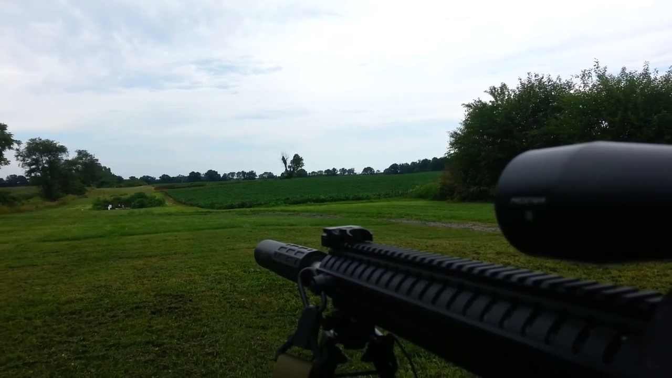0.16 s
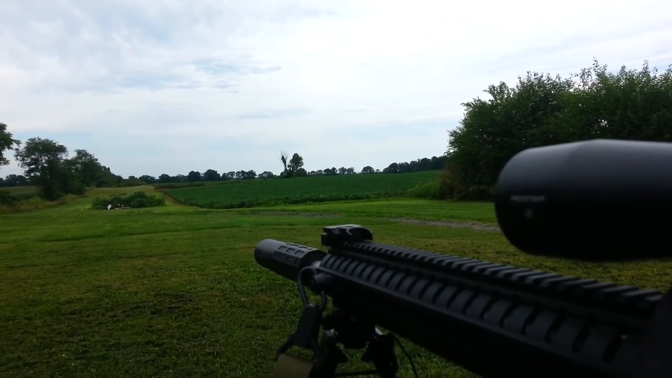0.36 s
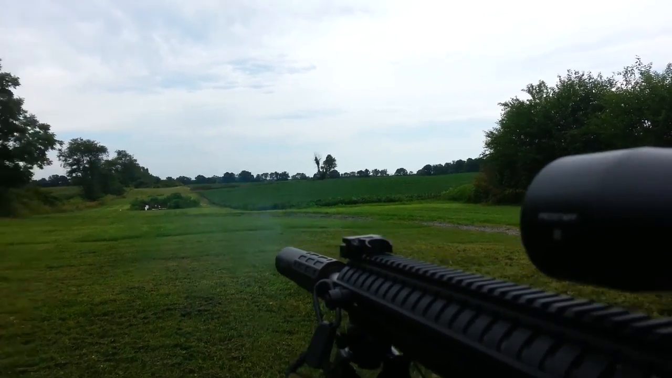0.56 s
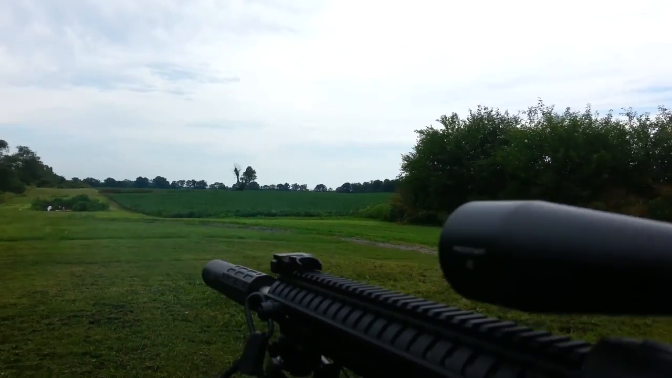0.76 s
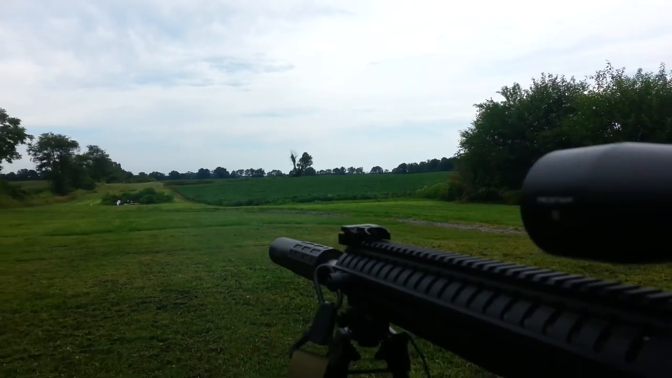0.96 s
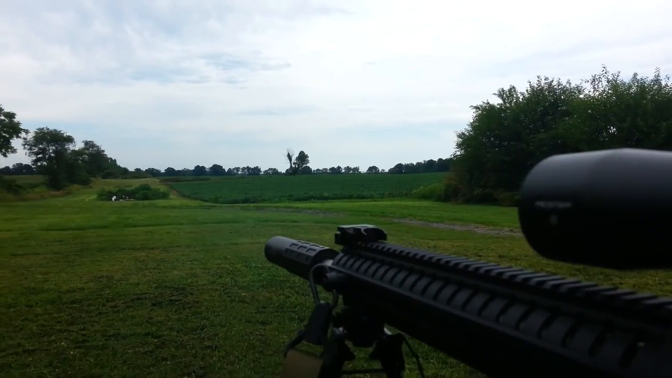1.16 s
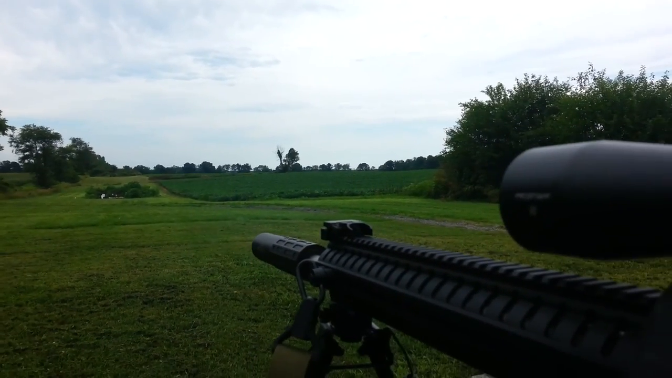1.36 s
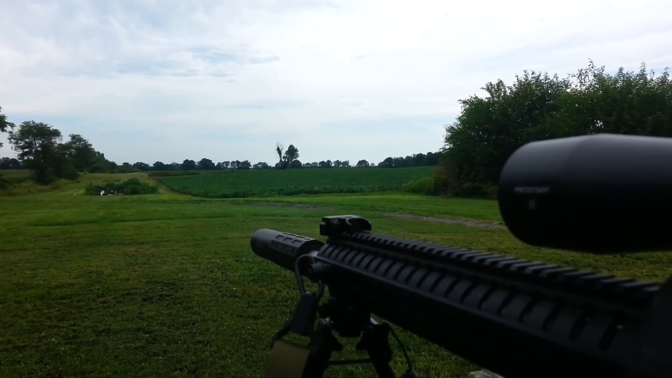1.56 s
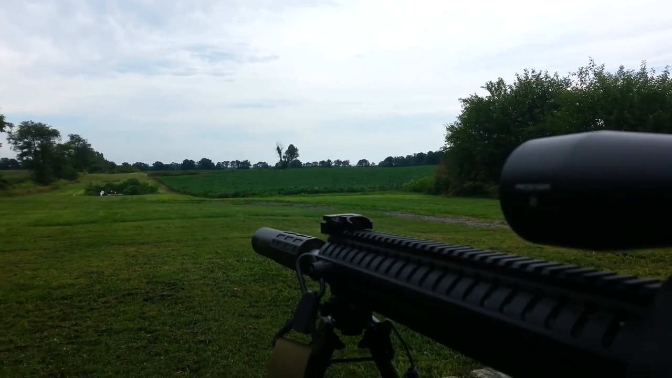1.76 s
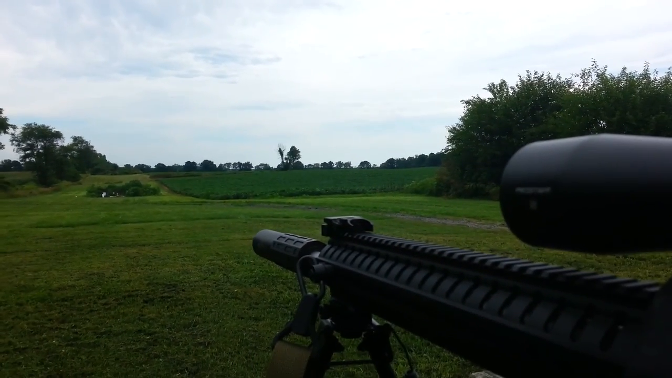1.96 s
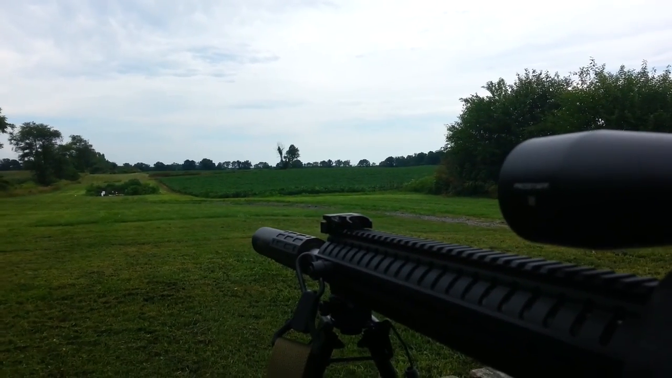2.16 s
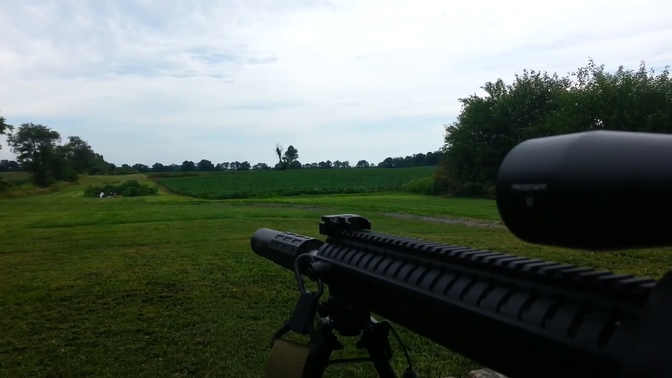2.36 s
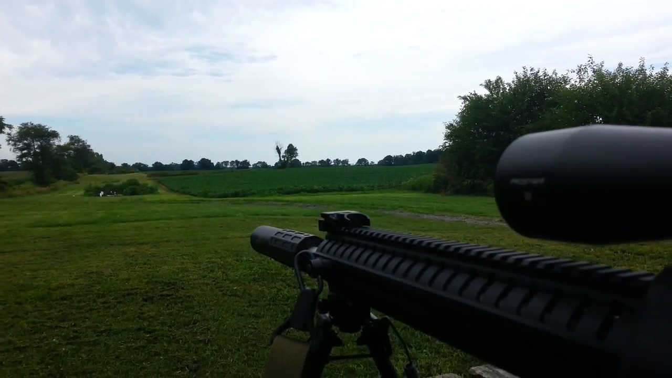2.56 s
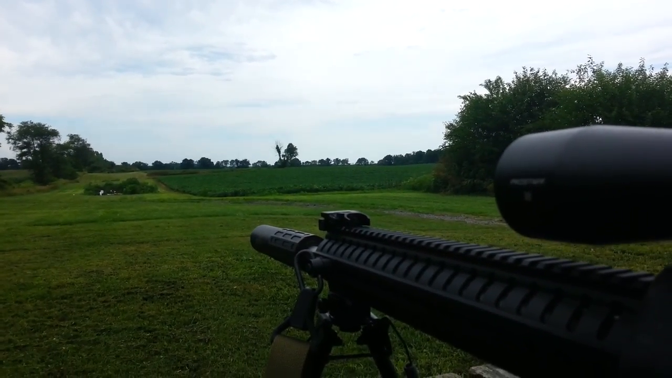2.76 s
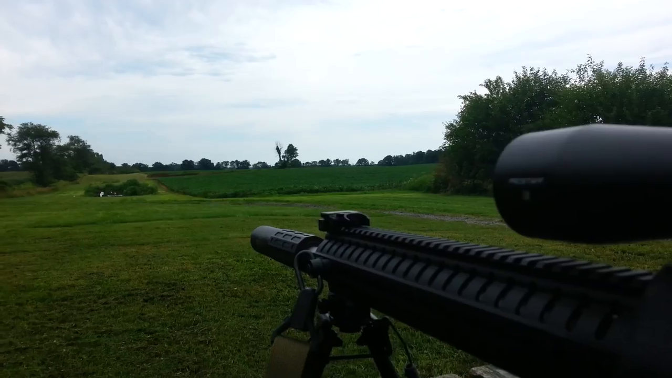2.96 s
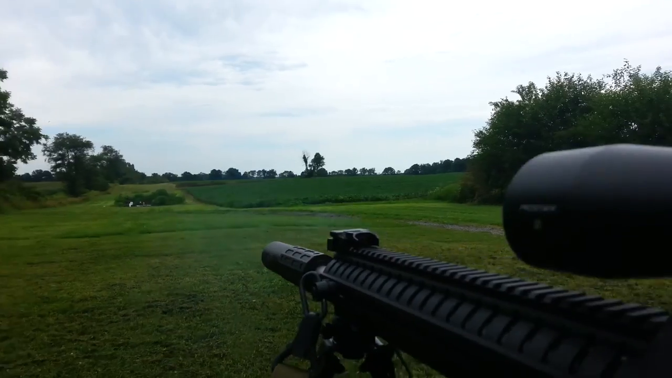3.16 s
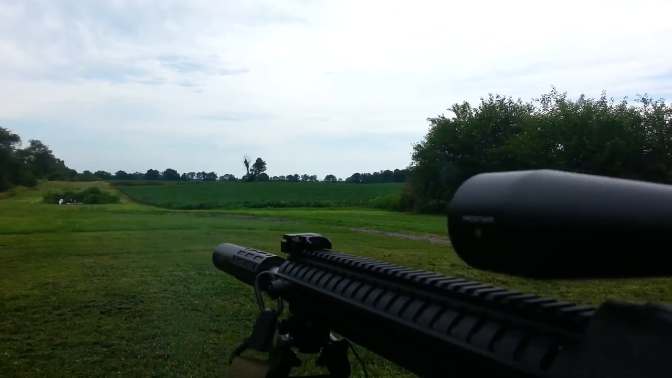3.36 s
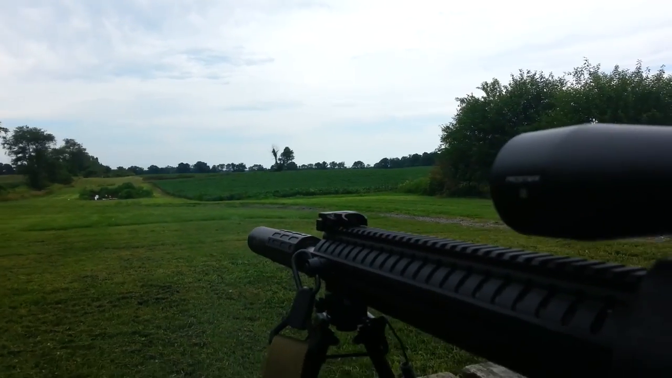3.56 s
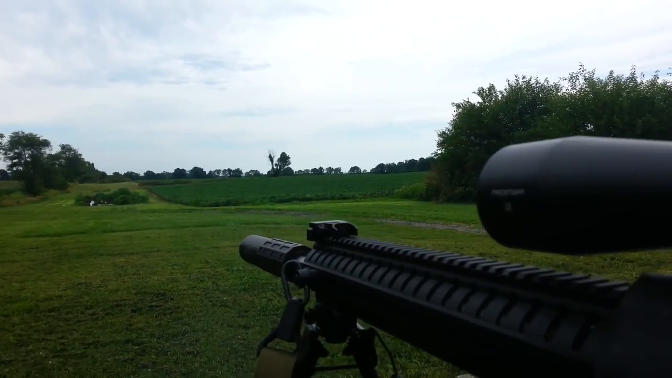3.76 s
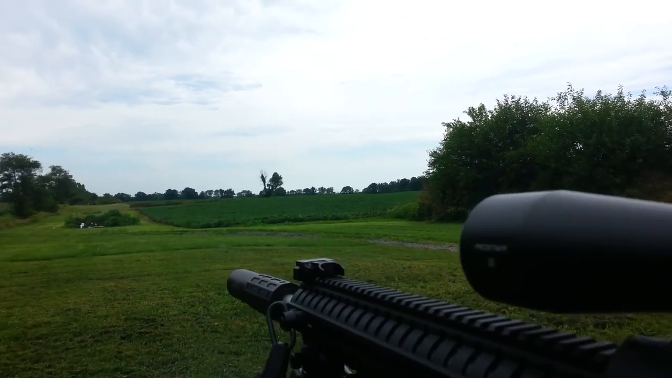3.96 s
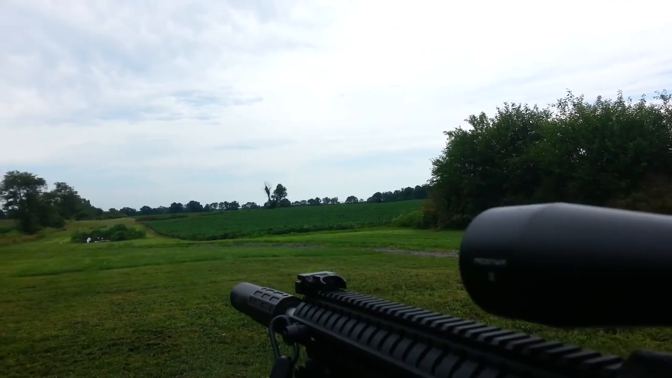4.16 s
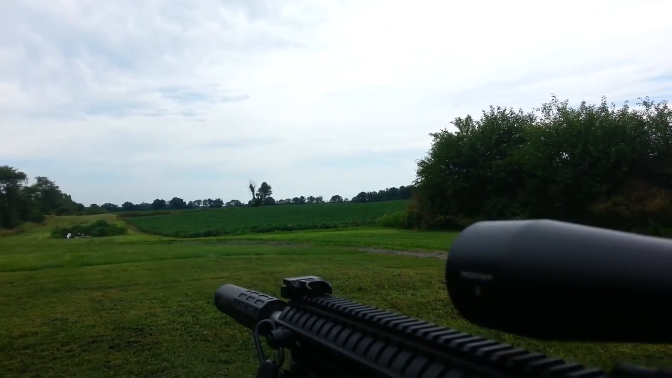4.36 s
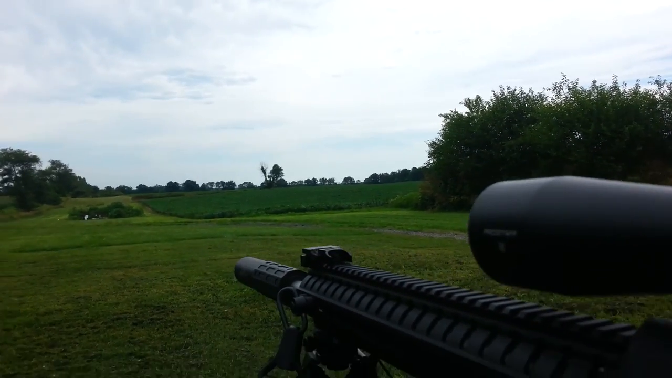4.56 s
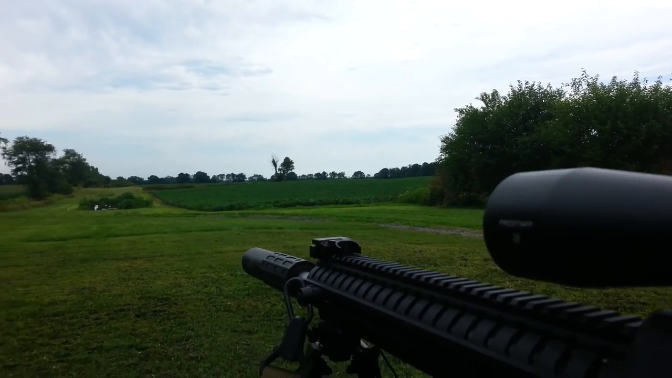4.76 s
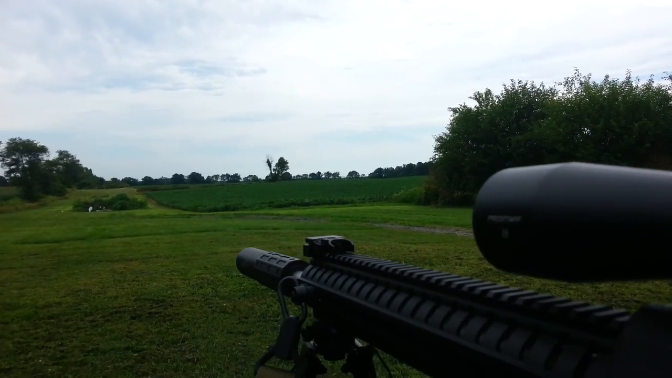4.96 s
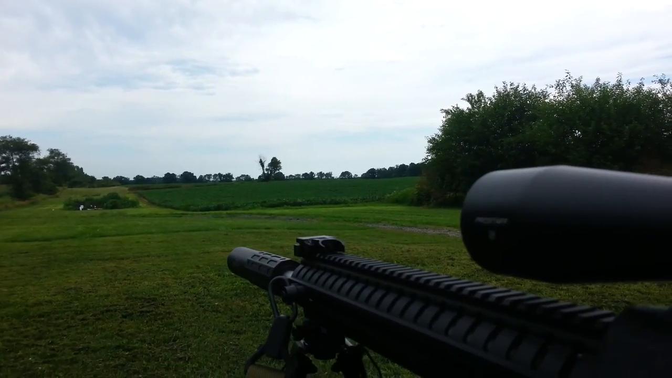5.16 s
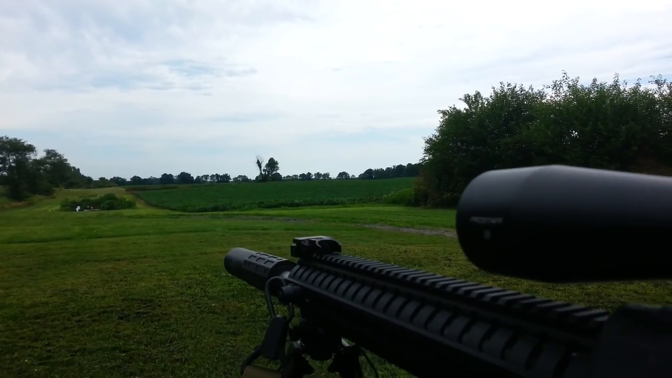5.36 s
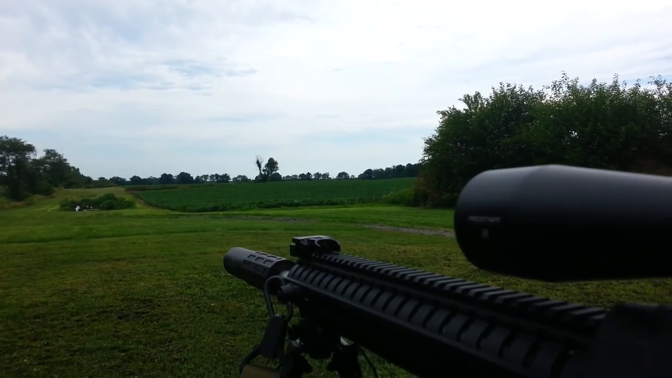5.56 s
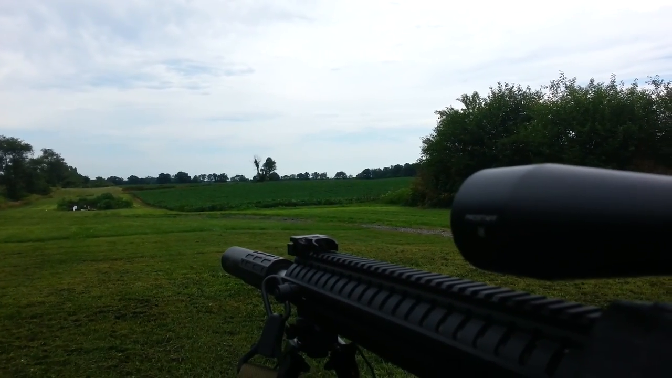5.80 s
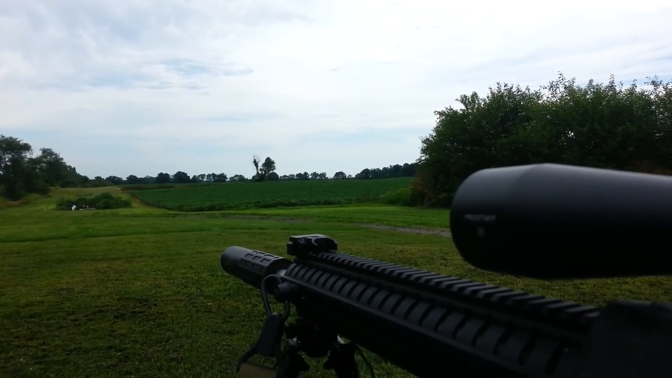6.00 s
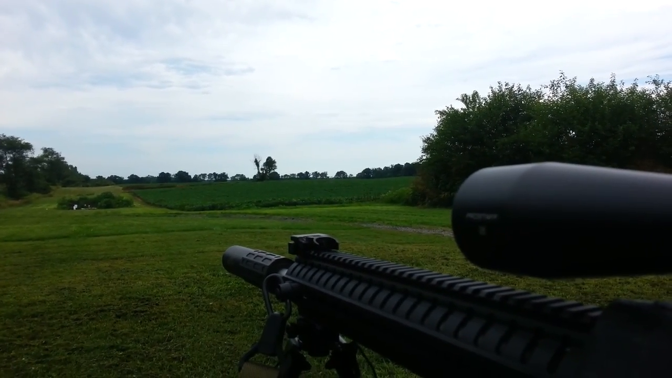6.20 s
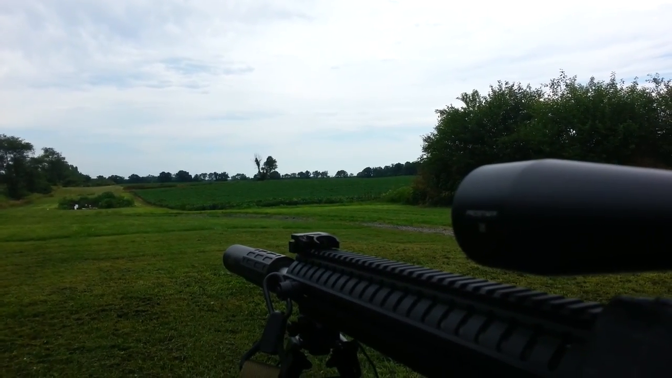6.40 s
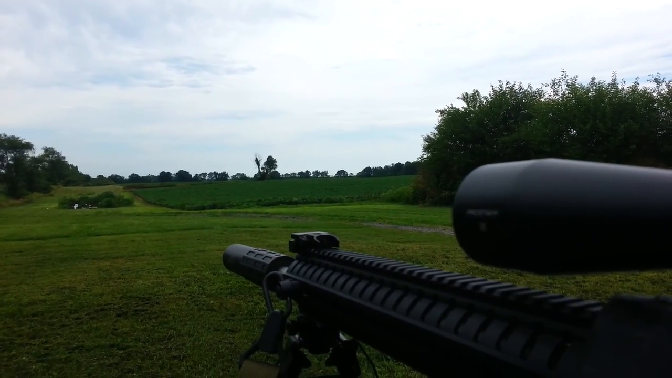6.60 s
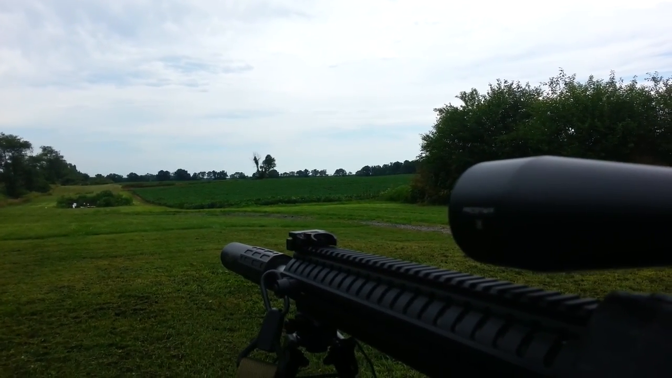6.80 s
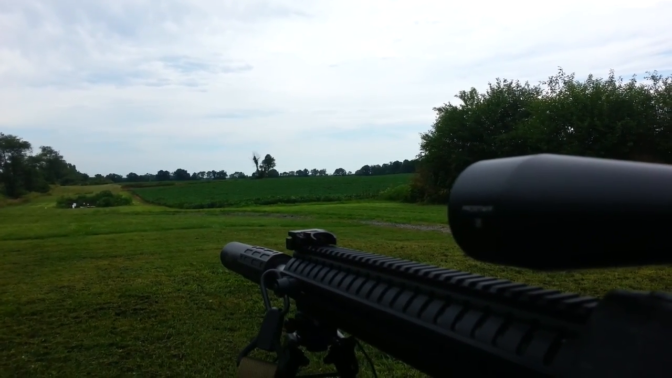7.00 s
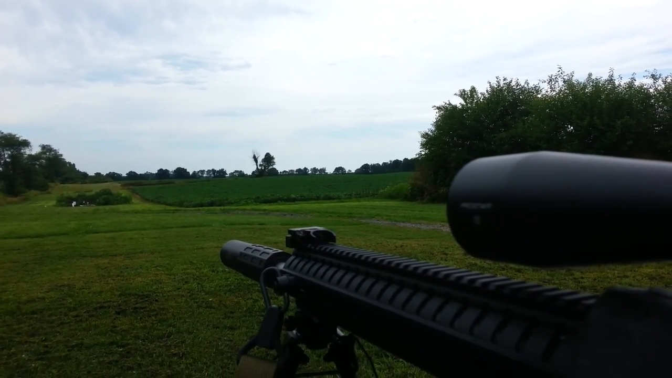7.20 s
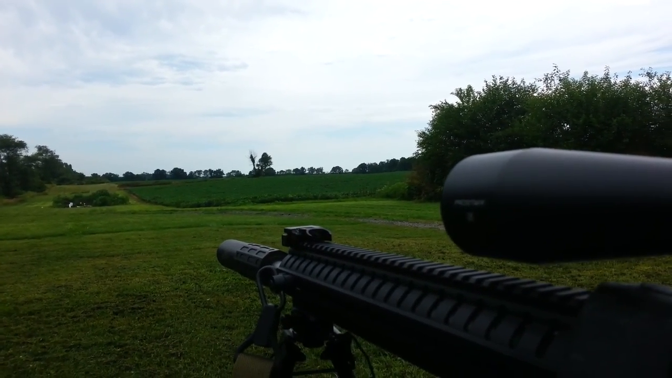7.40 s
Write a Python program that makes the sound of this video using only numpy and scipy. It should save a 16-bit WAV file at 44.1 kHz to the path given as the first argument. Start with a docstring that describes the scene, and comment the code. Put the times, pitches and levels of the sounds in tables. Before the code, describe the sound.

Close beside a suppressed rifle outdoors, a harsh snap and gas blast clip the microphone, with the action slamming shut and a bright hissing echo off bushes. A second later a hard crack marks the hit, with a faint steel ring. A second shot and hit repeat this about two and a half seconds later. Birds whistle and chirp over quiet air, breeze bumps and a faint left-side electrical ticking.

```python
"""Suppressed rifle shots on a mown field

Two shots, heard beside the gun, overload the microphone: each superposes filtered-noise bursts for a snap, a
gas blast and the closing action. Foliage and tree lines scatter them back as noise washes and wave packets;
a second later the bullet's hit cracks and steel rings in decaying sines. Gliding sine tones make birdsong
over hushed noise, air nudges the microphone in low packets, and pulses tick in the left channel."""
import sys
import numpy as np
from scipy import signal
from scipy.fft import rfft, irfft
from scipy.io import wavfile

SR = 44100
rng = np.random.default_rng(int(sys.argv[2]) if len(sys.argv) > 2 else 0)


def wav_record(signal):
    """Record a signal, one row per channel, as 16-bit PCM in the file named by sys.argv[1]."""
    frames = np.transpose(np.atleast_2d(signal))
    bounded = np.clip(frames, -1, 1)
    # unit amplitude maps onto the largest positive 16-bit level
    quanta = np.round(bounded * 32767).astype(np.int16)
    wavfile.write(sys.argv[1], SR, quanta)


N = 328104

# In all tables "balance" is the left level minus the right level.
# Spectra, as relative density: [f/Hz, level/dB]
# open air and microphone hiss
AIR_SPECTRUM = [(20, -33.5), (33, -18), (55, -6.5), (95, -3), (160, -6.5), (300, -11), (600, -15.5),
                (1200, -20), (2500, -22.5), (3600, -23.5), (6300, -29.5), (9000, -28), (14500, -27.5)]
# snap of the shot, also used for the debris of a hit
SNAP_SPECTRUM = [(30, -11), (300, -7), (1200, -1.5), (3000, 0.5), (6000, -4), (14000, -12)]
# gas blast
BLAST_SPECTRUM = [(20, -13.5), (36, -12), (75, -20.5), (120, -13), (190, -4.5), (350, 1), (700, -1.5),
                  (1100, 1), (1500, 0.5), (2600, 1.5), (4200, -1.5), (6000, -5.5), (10000, -6.5),
                  (15000, -10.5)]
# closing action
SLAM_SPECTRUM = [(30, -9), (300, -12.5), (1200, -5.5), (3600, 2.5), (6000, -6), (14000, -13.5)]
# bullet striking the target
HIT_SPECTRUM = [(25, -11.5), (90, -7), (220, -19), (480, -10), (660, -0.5), (830, -7.5), (1080, 2.5),
                (1500, -1), (2200, -0.5), (3100, -1), (3800, 0.5), (4500, -6.5), (6000, -12), (9000, -17.5),
                (14000, -22)]
# short echo of that strike
HIT_ECHO_SPECTRUM = [(300, -17), (600, -4), (850, -2.5), (1100, -3), (1600, -11.5), (2500, -16),
                     (4000, -13), (6000, -31.5), (12000, -42)]
# sound scattered by foliage
SCATTER_SPECTRUM = [(50, -40), (110, -27), (220, -11), (380, -24), (520, -16.5), (800, -13), (1150, -12),
                    (2100, 0), (2900, 2.5), (3900, 0), (5800, -12.5), (8500, -11), (11500, -22.5),
                    (14500, -22)]

# strongest bumps of air on the microphone: [t/s, level/dB, balance/dB]
STRONG_BUMPS = [(3.915, -41.5, 17), (4.542, -39, -8), (4.612, -40.5, -10), (4.893, -34, 15.5),
                (5.841, -34.5, 25), (5.892, -33, 11.5), (7.19, -42.5, 10), (7.282, -43, -1.5)]
# faint rustles near the gun:
# [centre t/s, level/dB, centre f/Hz, half-width/octaves, half-length/s, balance/dB]
RUSTLE_PACKETS = [(2.605, -55, 2280, 0.45, 0.034, -8), (4.32, -53, 2640, 0.62, 0.081, -11),
                  (5.55, -56, 2040, 0.3, 0.081, -4.5)]
# kinds of bird note, each from its own perch:
# {kind: [length/s, start/semitones, end/semitones (re middle pitch), buzz depth/Hz, balance/dB]}
NOTE_KINDS = {"trill": (.6, .7, -.6, 170, -13), "whistle": (.085, -.7, -.35, 0, -9),
              "long whistle": (.125, .2, 0, 35, 10), "thin note": (.13, .15, .05, 0, 4),
              "upsweep": (.105, -2.3, 6, 0, -16), "downsweep": (.09, 8, -5.3, 0, -14),
              "chip": (.018, -.3, .3, 0, -4), "slur": (.105, .45, .05, 0, -8),
              "buzz": (.16, .6, -.25, 220, -5)}
# bird notes: [t/s, kind, middle f/Hz, level at middle pitch/dB]
SONG = [(1.46, "trill", 3470, -59.5), (2.156, "whistle", 3410, -46.5), (2.49, "whistle", 3360, -53),
        (2.846, "whistle", 3330, -49.5), (2.335, "thin note", 6820, -66), (2.67, "thin note", 6720, -66),
        (4.405, "upsweep", 3750, -54.5), (4.611, "downsweep", 3684, -54.5), (4.745, "upsweep", 3750, -54),
        (4.96, "downsweep", 3650, -54), (5.098, "upsweep", 3600, -52.5), (4.98, "slur", 5970, -58.5),
        (5.275, "slur", 5830, -55.5), (5.504, "chip", 4650, -55.5), (5.529, "slur", 5750, -49.5),
        (5.711, "chip", 4600, -58), (5.733, "slur", 5620, -52), (5.886, "chip", 4570, -54),
        (5.902, "slur", 5620, -47.5), (6.062, "buzz", 3575, -53.5), (6.289, "thin note", 7690, -62.5),
        (6.678, "thin note", 7750, -65.5), (6.483, "long whistle", 3310, -50.5),
        (6.86, "long whistle", 3296, -54)]
# stretches of foliage, from the bushes on the right to the far woods:
# [delay/s, level/dB, rise/s, hold/s, t60/s, balance/dB]
FOLIAGE_STRETCHES = [(.095, -9, 0.017, .04, .55, -6), (.205, -15, 0.026, .2, .48, -7.5),
                     (.42, -27.5, .1, 0.13, 1.25, -4.5)]
# distinct echoes from banks and clumps of trees, the same places for both shots:
# [delay/s, level after first shot/dB, after second/dB, centre f/Hz, half-width/octaves, half-length/s, balance/dB]
REFLECTORS = [(0.119, -10, -10.5, 3168, .4, .034, -5.5), (0.133, -28, -32, 209, .7, 0.0088, 4.5),
              (.162, -30.5, -32.5, 200.7, .4, .011, 2.5), (0.257, -11, -10, 2740, 0.4, .012, -14),
              (.306, -25, -29, 803, 0.13, 0.012, -0.5), (0.346, -23.5, -26.5, 184, .2, 0.0054, 0),
              (.399, -14, -8, 2700, 0.97, 0.003, -9), (0.407, -16, -28.5, 198, 0.083, 0.0052, 6),
              (.449, -30, -34, 910, .2, .011, -5), (0.552, -42, -30, 830, 1.1, 0.012, 4),
              (.557, -29.5, -38, 190, 0.47, 0.016, -2), (.786, -39, -38, 1260, 1.02, 0.023, -7)]
# hits downrange: [t/s, smack level/dB, debris level/dB, echo level/dB, ring level/dB, balance/dB]
TARGET_HITS = [(1.4291, 1, -19.5, -31.5, -63, -4), (4.0349, 1.5, -37.5, -39, -55.5, -1.5)]
# modes of the steel target: [f/Hz, level re ring level/dB, t60/s]
STEEL_MODES = [(917, 0, 2.9), (1050, 5, .3), (3350, -0.5, 0.99), (4047, -3, 0.62)]
# shots: [t/s, level/dB, delay of the closing action/s, balance/dB]
RIFLE_SHOTS = [(0.4589, 0, .0678, -1), (3.0353, 0.5, .0694, 0)]

# levels re the shot, and delays after the snap (the shove is timed by its centre)
SNAP_DB, BLAST_DB, SLAM_DB, SHOVE_DB = -4.5, 3, 1.5, -16
BLAST_AFTER_S, SHOVE_AFTER_S = .0072, .025
SHOVE_HZ, SHOVE_OCTAVES, SHOVE_S = 38, .42, .018
ACTION_PAN_DB = -2.5  # the action lies to the right of the muzzle
DEBRIS_AFTER_S, HIT_ECHO_AFTER_S = .0103, .014
BUMP_HZ, BUMP_OCTAVES, BUMP_S = 120, .8, .019
# weaker bumps of air while the breeze is up
BREEZE_FROM_S, BREEZE_TO_S, BREEZE_DB = 4.1, 5.8, -45.5
TICK_HZ, TICK_START_S = 30.045266, .013
TOP_HZ = 14700


def amp(db):
    """Level-to-amplitude relation: 20 dB is a factor of ten."""
    return 10 ** (np.asarray(db) / 20)


def unit(x):
    """Normalization to a root-mean-square value of 1."""
    return x / np.sqrt(np.mean(x ** 2) + 1e-18)


def pan(db):
    """Intensity stereo: left and right gains for a level difference, at constant power."""
    return unit(amp(np.array([[db], [-db]]) / 2))


def clock(length):
    """Sampling: the instants from 0 to length seconds."""
    return np.arange(int(length * SR)) / SR


def add(out, start, x):
    """Superposition: x is summed into out from the time start."""
    i = int(round(start * SR))
    out[:, i:i + x.shape[1]] += x[:, :max(N - i, 0)]


def noise(size, spectrum, alike_hz, lag=0, grain=1):
    """Random-phase noise with a spectrum; two ports coherent below alike_hz, the right lag seconds late."""
    f = np.maximum(np.fft.rfftfreq(size, 1 / SR), 1)
    hz, db = np.transpose(spectrum)
    mid, side = np.exp(2j * np.pi * rng.random((2, len(f))))
    coherence = np.clip(.8 * np.sinc(f / alike_hz), -1, 1)
    pair = np.sqrt(1 + coherence) * mid + np.sqrt(1 - coherence) * side * np.array([[1], [-1]])
    delay = np.exp(-2j * np.pi * f * np.array([[0], [lag]]))
    # grain makes the noise lumpy before it is filtered
    white = irfft(pair * delay, size) * grain
    gain = amp(np.interp(np.log(f), np.log(hz), db))
    gain = gain / (1 + (18 / f) ** 4)  # the deepest bass rolls off
    return unit(irfft(rfft(white) * gain, size))


def butter(x, hz, kind, order=2):
    """Butterworth filtering: a maximally flat low-pass or high-pass."""
    sos = signal.butter(order, min(hz, SR / 2 - 1), kind, fs=SR, output="sos")
    return signal.sosfilt(sos, x)


def walk(size, rate):
    """Random fluctuation: unit-variance Gaussian knots, rate per second, joined by straight lines."""
    knots = rng.standard_normal(4096)
    return np.interp(np.arange(size) / SR * rate, np.arange(len(knots)), knots)


def dull(x, t, split_hz, loss_db):
    """Frequency-dependent damping: the treble above split_hz loses loss_db every second."""
    f = np.fft.rfftfreq(len(t), 1 / SR)
    low = irfft(rfft(x) / (1 + (f / split_hz) ** 2), len(t))
    return low + (x - low) * amp(-abs(loss_db) * t)


def envelope(t, rise, hold, t60):
    """Exponential decay of 60 dB in t60, from hold seconds on, after a linear rise."""
    return np.minimum(t / rise, 1) * np.exp(-np.log(1000) * np.maximum(t - hold, 0) / t60)


def burst(spectrum, rise, hold, t60, alike_hz, loss_db, stop=.5, lag=0):
    """Turbulent pressure burst: a steep front, a hold, a darkening decay that dies after stop seconds."""
    t = clock(.5)
    shape = envelope(t, rise, hold, t60) / np.sqrt(1 + (t / stop) ** 20)
    return dull(noise(len(t), spectrum, alike_hz, lag), t, 5000, loss_db) * shape


def packets(table, alike_hz):
    """Wave packets: band-limited noise under a Gaussian window centred on the stated time."""
    out, t = np.zeros((2, N)), clock(.2) - .1
    octaves = np.linspace(-4, 4, 33)
    for centre, db, hz, width, length, pan_db in table:
        detuning = (octaves / width) ** 2
        spectrum = np.transpose([hz * 2 ** octaves, -20 * np.log10(1 + detuning) - detuning])
        window = np.exp(-2 * (t / length) ** 2)
        wave = unit(noise(len(t), spectrum, alike_hz) * window)
        wave = wave * np.sqrt(np.mean(window ** 2))  # restores the energy of the window
        add(out, centre + t[0], wave * amp(db) * pan(pan_db))
    return out


def air():
    """Stationary broadband noise whose bass is randomly modulated, as by a breeze."""
    hush = noise(N, AIR_SPECTRUM, 280) * amp(-53)
    bass = butter(hush, 220, "low")
    return hush + bass * (amp(2.5 * walk(N, 6.4)) - 1) * .6


def ticking(width=.00138, db=-29):
    """Electrical pickup: a periodic square pulse, width seconds long, band-limited, left channel only."""
    since = (np.arange(N) / SR - TICK_START_S) % (1 / TICK_HZ)
    pulses = np.clip((width - since) * SR, 0, 1)
    ticks = butter(butter(pulses, 210, "high"), 1400, "low")
    return ticks * amp(db) * np.array([[1], [0]])


def bumps(count=7, spread_db=8):
    """Air pressure on the microphone: strong low packets, and weak ones at random while the breeze is up."""
    weak = [(BREEZE_FROM_S + when * (BREEZE_TO_S - BREEZE_FROM_S), BREEZE_DB, -spread_db * side)
            for when, side in rng.random((count, 2))]
    table = [(s, db, BUMP_HZ, BUMP_OCTAVES, BUMP_S, pan_db) for s, db, pan_db in STRONG_BUMPS + weak]
    return packets(table, alike_hz=192)


def rustles():
    """Faint rustles near the gun, as brief packets of band-limited noise."""
    return packets(RUSTLE_PACKETS, alike_hz=800)


def birds(buzz_hz=62, echo_t60=1.4, echo_db=-2, flutter_db=3, fade_db_per_octave=5):
    """Frequency modulation: tones glide through three pitches, weaker as they climb; trees reverberate."""
    out = np.zeros((2, N))
    for start, kind, middle_hz, db in SONG:
        length, first, last, depth_hz, pan_db = NOTE_KINDS[kind]
        t = clock(length)
        u = t / length
        glide = np.polyfit([0, .5, 1], [first, 0, last], 2)
        octaves = np.polyval(glide, u) / 12
        buzz = np.sin(2 * np.pi * buzz_hz * t) + .5 * walk(len(t), 300)
        hz = middle_hz * 2 ** octaves + depth_hz * buzz + 14 * walk(len(t), 200)
        level_db = db - fade_db_per_octave * octaves + flutter_db * walk(len(t), 140)
        tone = np.sin(2 * np.pi * np.cumsum(hz) / SR)
        add(out, start, tone * np.sin(np.pi * u) * amp(level_db) * pan(pan_db))
    t = clock(1)
    trees = rng.standard_normal((2, len(t))) * np.exp(-np.log(1000) * t / echo_t60)
    response = unit(trees) / np.sqrt(len(t))
    echo = signal.fftconvolve(out, response, axes=1)[:, :N]
    return out + amp(echo_db) * butter(echo, 3800, "low", order=3)


def foliage(rough_db=1.1, patchy_db=1.55, clear_s=.076):
    """Diffuse scattering: small reflections merge into noise, duller as the air path passes clear_s."""
    out, t = np.zeros((2, N)), clock(1)
    for start, shot_db, _, _ in RIFLE_SHOTS:
        for delay, db, rise, hold, t60, pan_db in FOLIAGE_STRETCHES:
            # whole clumps and single branches answer unevenly
            grain = amp(patchy_db * walk(len(t), 110) + rough_db * walk(len(t), 1500))
            wash = noise(len(t), SCATTER_SPECTRUM, 880, grain=grain)
            # two damping stages together make the air absorb the top most
            late = np.maximum(t + delay - clear_s, 0)
            wash = dull(wash, late, split_hz=6500, loss_db=48.5)
            wash = dull(wash, late, split_hz=6000, loss_db=24)
            wash = wash * envelope(t, rise, hold, t60)
            add(out, start + delay, wash * amp(shot_db + db) * pan(pan_db))
    return out


def echoes():
    """Discrete reflection: each bank or clump answers each shot after its own delay, in its own band."""
    answers = []
    for delay, first_db, second_db, hz, width, length, pan_db in REFLECTORS:
        for shot, db in zip(RIFLE_SHOTS, (first_db, second_db)):
            answers.append((shot[0] + delay, db, hz, width, length, pan_db))
    return packets(answers, alike_hz=1020)


def target():
    """Impact and modal decay: a hard smack, a spray of debris, a short echo and damped modes of steel."""
    out, t = np.zeros((2, N)), clock(2)
    ring = sum(amp(db) * np.sin(2 * np.pi * hz * t) * np.exp(-np.log(1000) * t / t60)
               for hz, db, t60 in STEEL_MODES)
    for start, db, debris_db, echo_db, ring_db, pan_db in TARGET_HITS:
        smack = burst(HIT_SPECTRUM, rise=.0011, hold=.0071, t60=.032, alike_hz=6030, loss_db=204.5, lag=.00021)
        spray = burst(SNAP_SPECTRUM, rise=.002, hold=.0092, t60=.067, alike_hz=800, loss_db=62)
        echo = burst(HIT_ECHO_SPECTRUM, rise=.005, hold=.01, t60=.44, alike_hz=835, loss_db=41)
        add(out, start, smack * amp(db) * pan(pan_db))
        add(out, start, ring * amp(ring_db) * pan(pan_db))
        add(out, start + DEBRIS_AFTER_S, spray * amp(debris_db) * pan(pan_db))
        add(out, start + HIT_ECHO_AFTER_S, echo * amp(echo_db) * pan(-3))
    return out


def rifle():
    """Impulsive radiation: a snap, suppressed gas blowing down, its pressure shove, the action closing."""
    out, shoves = np.zeros((2, N)), []
    for start, db, closes, pan_db in RIFLE_SHOTS:
        snap = burst(SNAP_SPECTRUM, rise=.00086, hold=.0016, t60=.029, alike_hz=1500, loss_db=30, lag=.00026)
        blast = burst(BLAST_SPECTRUM, rise=.0014, hold=.0099, t60=.31, alike_hz=1960, loss_db=72,
                      stop=.064, lag=.0003)
        slam = burst(SLAM_SPECTRUM, rise=.0034, hold=.0079, t60=.072, alike_hz=800, loss_db=35)
        add(out, start, snap * amp(db + SNAP_DB) * pan(pan_db))
        add(out, start + BLAST_AFTER_S, blast * amp(db + BLAST_DB) * pan(pan_db))
        add(out, start + closes, slam * amp(db + SLAM_DB) * pan(pan_db + ACTION_PAN_DB))
        shoves.append((start + SHOVE_AFTER_S, db + SHOVE_DB, SHOVE_HZ, SHOVE_OCTAVES, SHOVE_S, pan_db))
    return out + packets(shoves, alike_hz=300)


def scene():
    """Linear superposition of all sound reaching the two microphone ports."""
    background = air() + bumps() + rustles() + birds()
    scattered = foliage() + echoes()
    return background + scattered + target() + rifle()


def record(dry):
    """Saturation and band limiting: ticking joins in, peaks clip hard, and the top above TOP_HZ is cut."""
    clipped = np.clip(dry + ticking(), -.93, .93)
    low_pass = signal.ellip(8, .2, 70, TOP_HZ, fs=SR, output="sos")
    return signal.sosfilt(low_pass, clipped)


dry = scene()
out = record(dry)
wav_record(out)
```